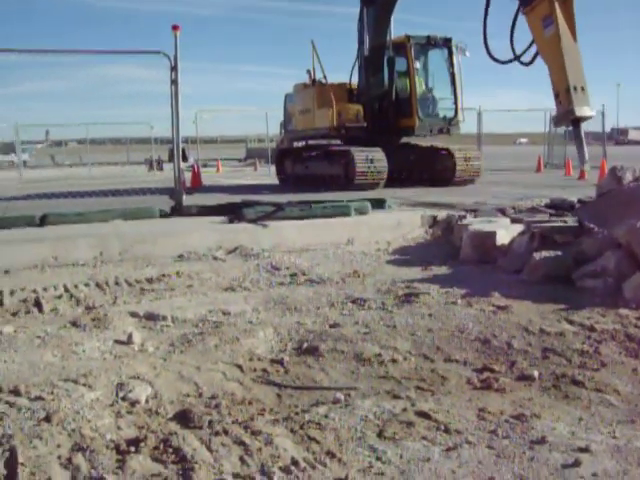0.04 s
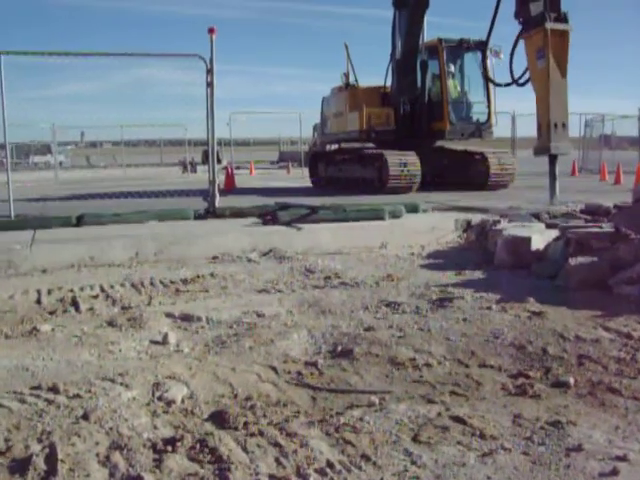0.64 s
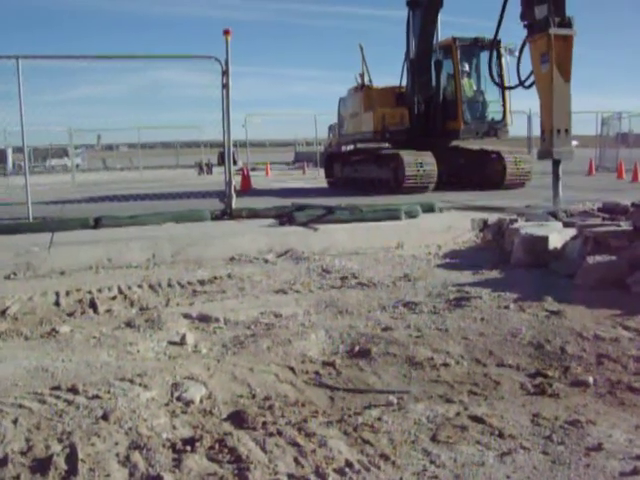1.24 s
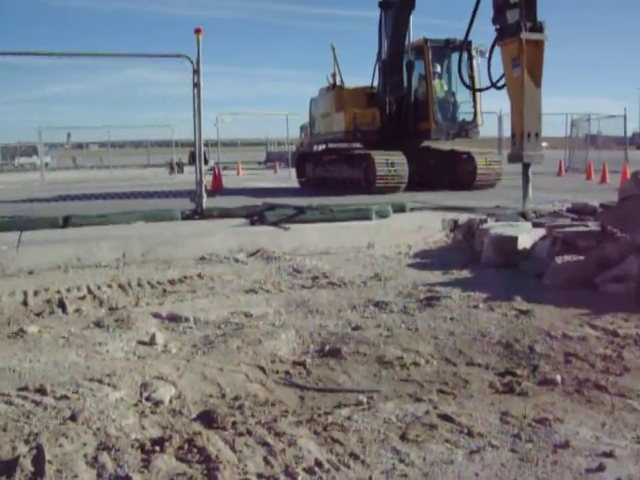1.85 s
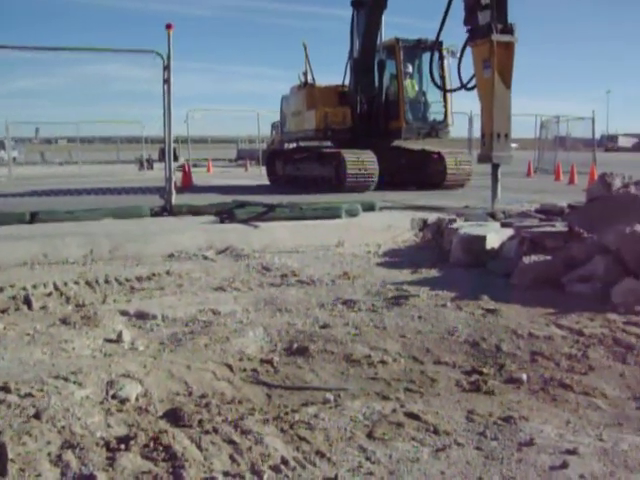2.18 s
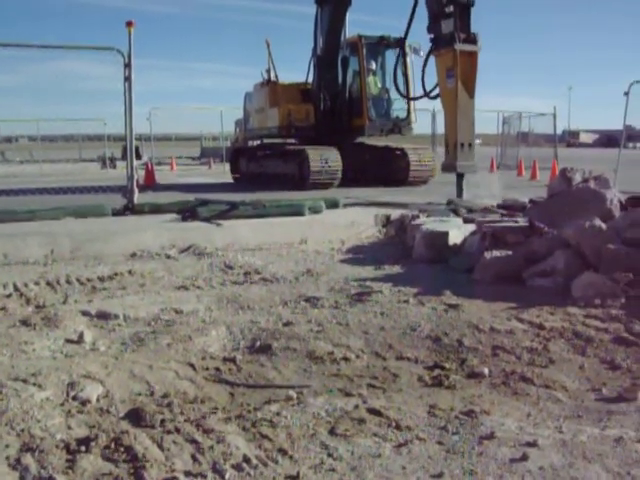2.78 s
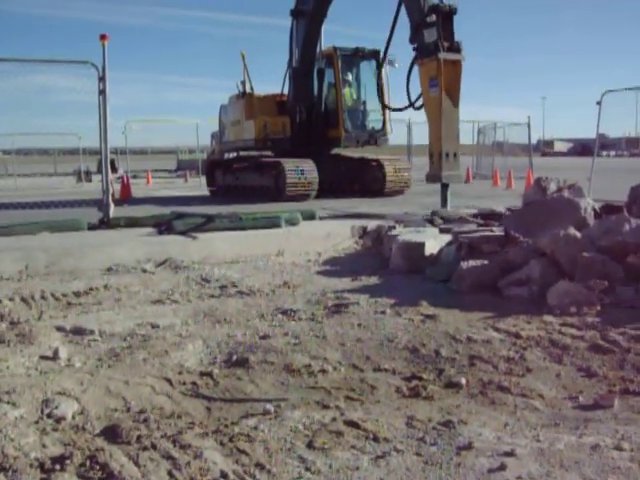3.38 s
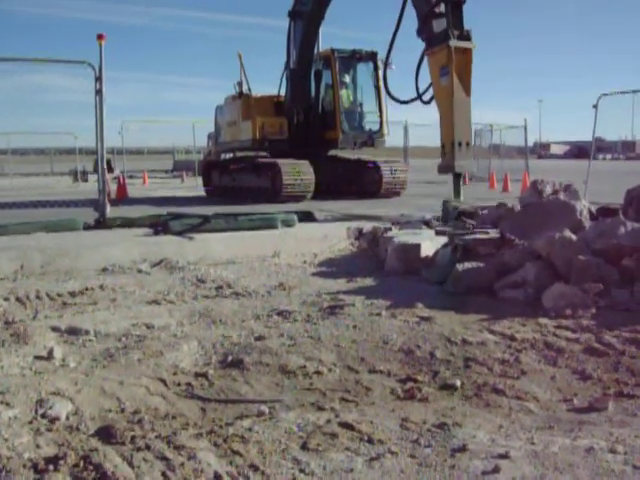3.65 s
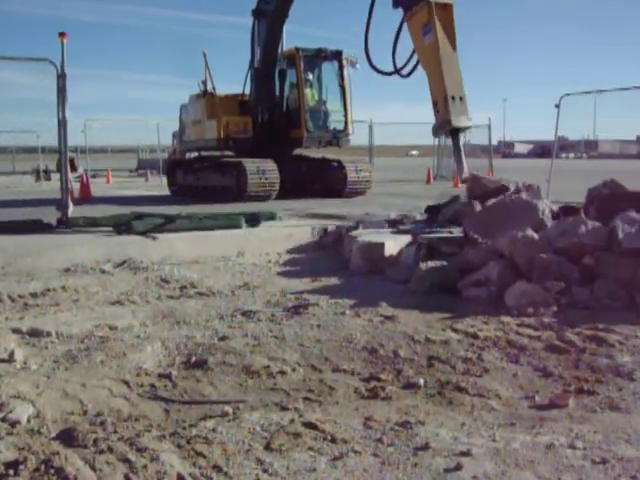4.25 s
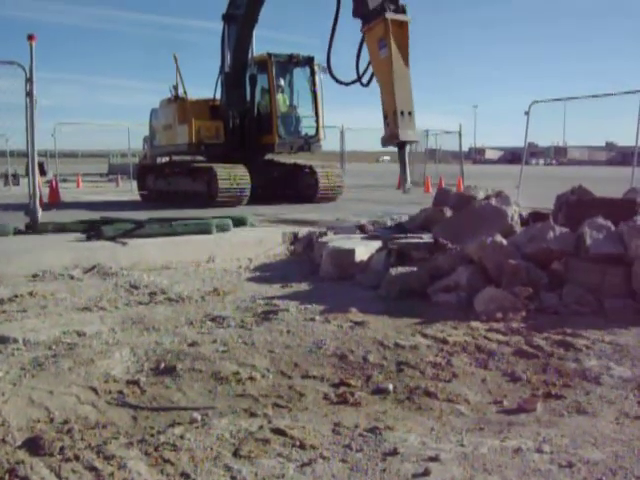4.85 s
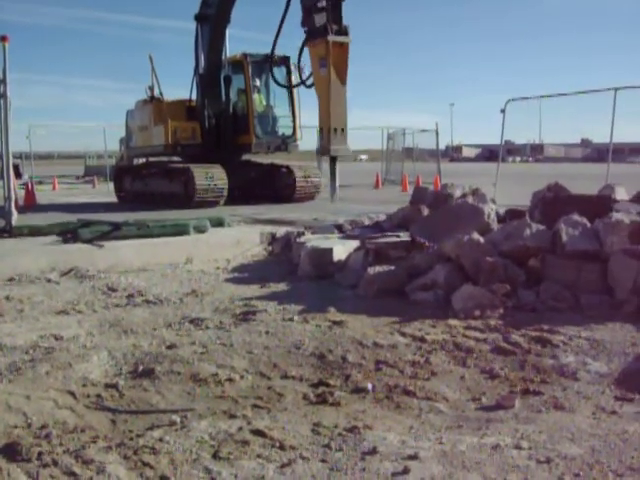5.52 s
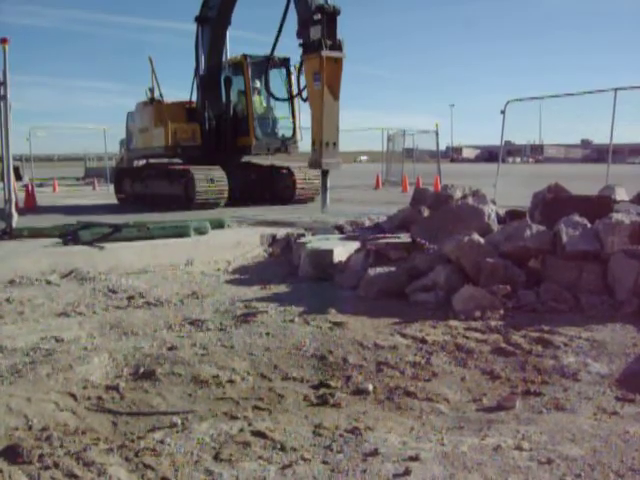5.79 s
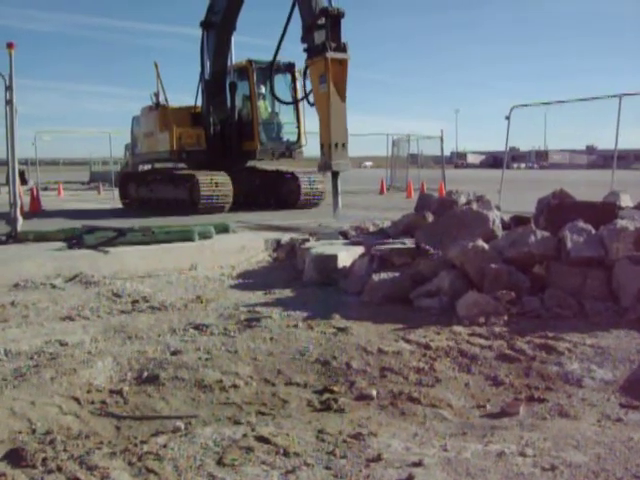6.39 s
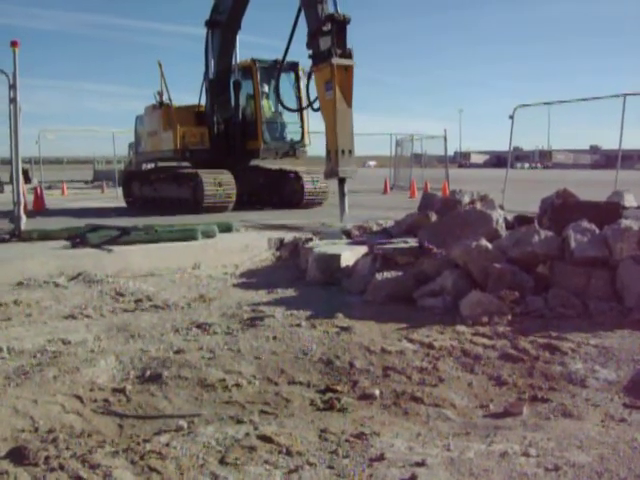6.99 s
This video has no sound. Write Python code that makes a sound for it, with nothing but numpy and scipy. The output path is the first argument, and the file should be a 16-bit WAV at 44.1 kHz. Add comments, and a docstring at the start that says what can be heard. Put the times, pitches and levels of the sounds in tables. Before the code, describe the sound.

An excavator's diesel engine roars steadily on open ground. After a few stone knocks, its hydraulic breaker hits rock eleven times in a fast, even run, each blow cracking, thudding and ringing the steel chisel. Rubble drops, then the chisel scrapes through grit, clinks and shoves stones while a valve whistles briefly with the boom's moves. The microphone's level dips under the blows, so the engine ducks and swells back.

```python
"""An excavator's hydraulic breaker pounds a rock: eleven blows that crack, thud and ring its steel chisel.
Around the blows the chisel knocks, shoves and scrapes stones, and a valve sings as the boom swings.
The diesel engine roars steadily underneath, on open ground. An automatic volume control turns
everything down under the blows, so the engine sounds quieter there and swells back afterwards."""
import sys
import numpy as np
from scipy.fft import rfft, irfft, next_fast_len
from scipy.io import wavfile
from scipy.ndimage import uniform_filter1d, minimum_filter1d, map_coordinates

SR = 44100
rng = np.random.default_rng(int(sys.argv[2]) if len(sys.argv) > 2 else 0)


def to_wav(sig):
    """Store sig (one row per channel, or 1-D mono) as 16-bit WAV at the path in sys.argv[1].

    Samples outside -1..1 are clipped; the rate is SR.
    """
    pcm = np.clip(np.atleast_2d(sig), -1, 1) * 32767
    pcm = np.round(pcm).astype(np.int16)
    wavfile.write(sys.argv[1], SR, pcm.T)  # frames by channels


N = 310905


def amp(db):
    """Turn decibels into a gain."""
    return 10 ** (np.asarray(db) / 20)


def unit(x):
    """Scale x to an average (rms) level of 1."""
    return x / np.sqrt(np.mean(x ** 2) + 1e-20)


def wobble(rate):
    """A smooth random curve with rate new values a second."""
    points = rng.standard_normal(int(N * rate / SR) + 4)
    return map_coordinates(points, [np.arange(N) * rate / SR], order=2)


def jitter(length, smoothing):
    """A fast random tremble, averaged over smoothing samples."""
    return unit(uniform_filter1d(rng.standard_normal(length), size=smoothing))


def filtered(x, response):
    """Scale each frequency in x by response(hz)."""
    size = next_fast_len(len(x) + 8192)
    return irfft(rfft(x, size) * response(np.fft.rfftfreq(size, 1 / SR)), size)[:len(x)]


def noise(spectrum, length):
    """Noise at level 1, its tone shaped by rows of frequency in Hz and level in dB."""
    points_hz, db = np.transpose(spectrum)
    white = rng.standard_normal(length)
    return unit(filtered(white, lambda hz: amp(np.interp(np.log(hz + 1), np.log(points_hz), db))))


def fade(t, t60):
    """Die away, dropping 60 dB in t60 seconds (the fade time)."""
    return np.exp(-np.log(1000) * t / max(t60, 1e-3))


def add(track, start, sound):
    """Mix a sound into the track at start seconds."""
    part = track[max(round(start * SR), 0):][:len(sound)]
    part += sound[:len(part)]


# Engine notes and gear whine. Each row: multiple of the crankshaft's speed, level in dB.
CRANK_TONES = [(1, -27), (2, -33), (3, -13.5), (4, -9.5), (5, -3), (6, -4.5), (7, -10.5), (8, -7), (9, -4),
               (10, -8.5), (11, -5), (12, -1.5), (13, -10), (14, -10.5), (15, -26), (16, -3.5), (17, -1),
               (18, -16), (19, -15), (20, -11), (21, -10.5), (22, -3), (23, 2), (24, -30.5), (25, -3),
               (26, -2.5), (27, -15), (28, -4), (29, -7), (30, -10.5)]
GEAR_TONES = [(52, -13), (58, -17)]
# Cooling fan and oil pump. Each row: pitch in Hz, level in dB, waver as a share of the pitch.
FAN_AND_PUMP = [(264.3, -11.5, 0.009), (948, -19, .016), (1049, -20.5, 0.0025)]
def spinning_parts(turns, tone_db=-9, flutter_db=2):
    """Crankshaft, gears, fan and pump hum; moving air makes each note flutter on its own."""
    tones = hums = 0
    for multiple, db in list(CRANK_TONES) + list(GEAR_TONES):
        level = amp(db + flutter_db * wobble(8))
        tones += level * np.sin(2 * np.pi * (multiple * turns + 0.71 * rng.random()))
    for hz, db, waver in FAN_AND_PUMP:
        level = amp(db + flutter_db * wobble(3.8))
        pitch = hz * (1 + waver * wobble(25))
        hums += level * np.sin(2 * np.pi * np.cumsum(pitch) / SR)
    return amp(tone_db) * tones + hums


# The strength of each of the three firings in one crankshaft turn.
FIRING_STRENGTHS = [0.94, 0.46, 0.36]
# Injector clatter, burning fuel, and a bright tick that the stones also use.
# Each row: frequency in Hz, level in dB.
CLATTER_SPECTRUM = [(700, -27), (1050, -5.5), (1550, -0.5), (1720, -12), (1900, 7), (2450, 4),
                    (3300, -27.5), (5500, -26)]
ROAR_SPECTRUM = [(100, -23.5), (200, -5), (290, -4), (380, -0.5), (500, 2.5), (660, 5), (950, 3),
                 (1180, -2.5), (1280, -11.5), (1450, -6), (1750, -13.5), (2450, -12), (3300, -17),
                 (5500, -25)]
TICK_SPECTRUM = [(500, -26.5), (1500, 1), (2250, 15), (3500, -4.5), (5000, -1), (6000, -10)]
def combustion(turns, turns_per_s, knock=1.35, scatter_db=1.24, sway_db=1.72):
    """The roar jumps at each firing, the injectors clatter, and each turn's hardest firing ticks."""
    per_turn = len(FIRING_STRENGTHS)
    firing, progress = np.divmod((turns + 1) * per_turn, 1)
    firing = firing.astype(int)
    scatter = amp(scatter_db * rng.standard_normal(firing.max() + 1))
    strength = np.take(FIRING_STRENGTHS, firing % per_turn) * scatter[firing]
    since_firing = progress / (turns_per_s * per_turn)
    pulses = unit(uniform_filter1d(1 + knock * strength * fade(since_firing, 0.14), size=50))
    # the same clatter repeats on every turn
    one_turn = noise(CLATTER_SPECTRUM, round(SR / turns_per_s))
    clatter = np.interp(turns % 1, np.linspace(0, 1, len(one_turn)), one_turn)
    sway = amp(sway_db * wobble(12))
    roar = amp(-3) * noise(ROAR_SPECTRUM, N) + amp(-20) * clatter
    tick = amp(-12) * fade(turns % 1 / turns_per_s, 0.025) * noise(TICK_SPECTRUM, N)
    return pulses * sway * roar + tick


# Spells when the engine's sound is turned down, or its rumble swells.
# Each row: start and end in seconds, change of roar in dB, change of rumble in dB.
VOLUME_CHANGES = [(0, 0.25, -5, -3.5), (1.498, 2.983, -1.5, -10.5), (3.402, 3.8, -0.5, 3.5),
                  (4.103, 4.957, -2.5, -2.5)]
# Exhaust rumble. Each row: frequency in Hz, level in dB.
EXHAUST_SPECTRUM = [(15, -34), (35, -25), (55, -19.5), (71, -4), (90, -14), (140, -1.5), (190, -2.5),
                    (270, -1.5), (400, -21.5), (900, -50)]
def engine(turns_per_s=27.055, roar_db=-12.5, rumble_db=-19, ramp_s=0.13, settled_s=4.9):
    """A six-cylinder diesel roars and rumbles; its speed wavers more while the chisel works."""
    t = np.arange(N) / SR
    for start, end, roar_change, rumble_change in VOLUME_CHANGES:
        depth = np.clip(1 + np.minimum(t - start, end - t) / ramp_s, 0, 1)
        roar_db += depth * roar_change
        rumble_db += depth * rumble_change
    working = np.clip(2 * (settled_s - t), 0, 1)
    wander = 0.0053 * wobble(5) + 0.012 * working * wobble(14)
    turns = turns_per_s * (t - 0.0155) + wander
    roar = spinning_parts(turns) + combustion(turns, turns_per_s)
    rumble = amp(rumble_db + 2.1 * wobble(15)) * noise(EXHAUST_SPECTRUM, N)
    return amp(roar_db) * roar + rumble


# One whistle for each move of the boom.
# Each row: start and length in seconds, level in dB, first and last pitch in Hz.
VALVE_WHISTLES = [(3.264, .24, -21, 980, 935), (3.8, .42, -22.5, 947, 961), (4.695, 0.11, -12.5, 975, 980),
                  (4.876, .38, -19, 960, 940), (5.297, .22, -20.5, 928, 975)]
def valve(sag_hz=11, waver=0.0027, ramp_s=0.024):
    """Oil squeezing through a valve sings a gliding note that sags in the middle."""
    track = np.zeros(N)
    for start, length, db, first_hz, last_hz in VALVE_WHISTLES:
        progress = np.linspace(0, 1, round(length * SR))
        hz = first_hz + (last_hz - first_hz) * progress - sag_hz * np.sin(np.pi * progress)
        hz *= 1 + waver * wobble(40)[:len(hz)]
        opening = np.minimum(np.minimum(progress, 1 - progress) * length / ramp_s, 1)
        add(track, start, amp(db) * opening * np.sin(2 * np.pi * np.cumsum(hz) / SR))
    return track


# Drags of the chisel. Each row: start and end in seconds, level at the end in dB.
CHISEL_DRAGS = [(0, .035, -25.5), (3.2, 4.02, -32.5), (5.15, 5.45, -39)]
# Crushed grit. Each row: frequency in Hz, level in dB.
GRIT_SPECTRUM = [(900, -28), (2200, -4), (3500, -1), (4800, 4.5), (6000, -9)]
def scraping(hiss_db=-35.5, growth_db=7.5, release_s=0.24, grain_db=4):
    """The tip crunches through grit, ever harder until it slips off, over a faint grainy hiss."""
    t = np.arange(N) / SR
    level = amp(hiss_db)
    for start, end, db in CHISEL_DRAGS:
        to_go = np.clip((end - t) / (end - start), 0, 1)
        release = fade(np.maximum(t - end, 0), release_s)
        level = level + (t >= start) * amp(db - growth_db * to_go) * release
    grains = amp(grain_db * wobble(150))
    return level * unit(grains * noise(GRIT_SPECTRUM, N))


# A loose stone's knock. Each row: frequency in Hz, level in dB.
STONE_SPECTRUM = [(100, -26.5), (330, 2), (550, 6.5), (800, 2), (1050, 3), (1350, -8), (1800, -13.5),
                  (2300, -8.5), (3300, -20.5), (6000, -30.5)]
def stone(pitch, rise_s=0.0017, fade_s=0.26, grit_db=-12, width_hz=110):
    """One stone knocks hollowly and sheds grit in uneven jolts."""
    t = np.arange(SR // 2) / SR
    jolts = unit(amp(-2.6 * jitter(len(t), 150)))
    swell = np.minimum(t / rise_s, 1)
    since_peak = np.maximum(t - rise_s, 0)
    knock = noise(STONE_SPECTRUM, len(t))
    hollow = unit(filtered(knock, lambda hz: 1 + 1.1 / (1 + ((hz - pitch) / width_hz) ** 2)))
    grit = amp(grit_db) * noise(TICK_SPECTRUM, len(t)) * fade(since_peak, 0.65 * fade_s)
    return swell * jolts * (hollow * fade(since_peak, fade_s) + grit)


# Knocked stones. Each row: start in seconds, level in dB, pitch in Hz.
STONE_KNOCKS = [(.012, -13, 620), (.124, -7, 793), (1.226, -10, 708), (2.556, -3.5, 1430),
                (2.791, -4, 1460), (3.231, -13.5, 640), (4.426, -8, 728), (4.625, -9.5, 1025)]
# Shoved stones. Each row: start in seconds, level in dB, swell time in seconds, pitch in Hz.
STONE_SHOVES = [(1.38, -9.5, .045, 970), (2.4, -0.5, 0.032, 880), (4.25, -8, 0.022, 1040),
                (4.48, -10, 0.013, 540), (4.78, -8, .04, 1054), (6.11, -9.5, .01, 767)]
def stones(pieces=6, rubble_from_s=2.3, rubble_to_s=2.95, rubble_db=-11.5, rubble_hz=1190):
    """Knocked stones sound at once, shoved ones swell, and rubble drops as the rock breaks."""
    track = np.zeros(N)
    for start, db, pitch in STONE_KNOCKS:
        add(track, start, amp(db) * stone(pitch))
    for start, db, rise_s, pitch in STONE_SHOVES:
        add(track, start, amp(db) * stone(pitch, rise_s, fade_s=0.33, grit_db=-13))
    for piece in range(pieces):
        start = rubble_from_s + (rubble_to_s - rubble_from_s) * (piece + rng.random()) / pieces
        pitch = rubble_hz * np.exp(0.25 * rng.normal())
        add(track, start, amp(rubble_db) * stone(pitch))
    return track


# Clinks of steel. Each row: start in seconds, pitch in Hz, level in dB, fade time in seconds.
TIP_CLINKS = [(4.184, 5500, -18, 0.058), (4.184, 4180, -28.5, 0.28), (4.705, 5040, -26.5, 0.14)]
def clinks():
    """The tip glances off a stone with a click and a short, high ping."""
    track, t = np.zeros(N), np.arange(SR // 2) / SR
    for start, hz, db, fade_s in TIP_CLINKS:
        click = amp(5) * noise(TICK_SPECTRUM, len(t)) * fade(t, 0.086)
        ping = np.sqrt(2) * fade(t, fade_s) * np.sin(2 * np.pi * hz * t)
        add(track, start, amp(db) * (ping + click))
    return track


# The low notes of the breaker's housing. Each row: pitch in Hz, level in dB, fade time in seconds.
HOUSING_NOTES = [(174.6, -3.5, 0.082), (207, 1, 0.078), (231.3, 0.5, 0.098)]
# Its dull shake. Each row: frequency in Hz, level in dB.
SHAKE_SPECTRUM = [(25, -28), (60, -28.5), (120, -14), (200, 10), (300, -15), (600, -29), (2000, -70.5)]
def housing_thud(t, detune=0.029):
    """A blow shakes the housing, at slightly different pitches each time."""
    notes = 0
    for hz, db, fade_s in HOUSING_NOTES:
        pitch = hz * (1 + detune * rng.normal())
        notes += amp(db) * fade(t, fade_s) * np.sin(2 * np.pi * pitch * t)
    shake = amp(-7) * noise(SHAKE_SPECTRUM, len(t)) * fade(t, 0.11)
    return (notes + shake) * (1 - fade(t, 0.03))


# The steel chisel's notes. Each row: pitch in Hz, level in dB, share of the ring time.
CHISEL_NOTES = [(2090, -15, .8), (2466, -6.5, .8), (2700, -22, 0.48), (3090, -17, 0.82), (3205, -10.5, 0.9),
                (4000, -21, 0.71), (4742, -1.5, 0.95), (4785, -13.5, 1), (5200, -17, 1), (5330, -20, 1),
                (5700, -17, 0.47)]
def chisel_ring(t, ping_db, free_s, tail, ring_s=0.5, weak_db=-12, scatter_db=3, linger_s=0.01):
    """The chisel rings as it bounces, until the rock grips it and chokes the main ping first."""
    main_db = max(db for hz, db, share in CHISEL_NOTES)
    ring = 0
    for hz, db, share in CHISEL_NOTES:
        weak = db < main_db
        # rattling in its sleeve blurs the chisel's notes
        blur = (0.3 if weak else 0.06) * jitter(len(t), 200)
        level = amp(db + (weak_db + scatter_db * rng.normal() if weak else ping_db))
        choke = 1 / (1 + (t / (free_s + linger_s * weak)) ** 8)
        note = np.sin(2 * np.pi * hz * t + blur + rng.uniform(0, 2 * np.pi))
        ring += level * (choke + tail) * fade(t, ring_s * share) * note
    return np.sqrt(2) * ring * (1 - fade(t, 0.0082))


# The blows. Each row: start in seconds, thud level in dB, change to the main ping in dB,
# seconds until the rock grips the chisel.
BREAKER_BLOWS = [(1.4669, -26, -18, 0.088), (1.601, -2, -10.5, 0.024), (1.7239, -1, -16.5, 0.012),
                 (1.8495, -0.5, -11.5, 0.0099), (1.9738, -2, -7.5, 0.013), (2.1055, -3.5, -12, 0.017),
                 (2.24, -2.5, -10.5, .017), (2.3719, -0.5, -10, 0.034), (2.507, -4.5, -7, 0.065),
                 (2.647, -2, -14, 0.017), (2.793, -8.5, -22, 0.013)]
# Steel cracking on rock. Each row: frequency in Hz, level in dB.
CRACK_SPECTRUM = [(100, -28.5), (400, 3.5), (750, 9.5), (1400, 1), (1800, -12), (2450, 8.5), (3600, -8),
                  (4900, 2), (6000, -10)]
def breaker(seated_db=-6.5, loss_db_per_s=128.5):
    """Each piston blow cracks on the rock, thuds in the housing and rings the chisel."""
    track, t = np.zeros(N), np.arange(SR // 2) / SR
    snap = amp(-1) * fade(t, 0.012)
    tail = amp(-16) * fade(t, 0.49)  # sound scattered by the ground and the machine
    for start, thud_db, ping_db, free_s in BREAKER_BLOWS:
        # a firmly seated chisel cracks hardest; the longer it rings free, the weaker the crack
        crack_db = seated_db - loss_db_per_s * free_s
        crack = amp(crack_db) * noise(CRACK_SPECTRUM, len(t)) * (snap + fade(t, 0.15) + tail)
        thud = amp(thud_db) * housing_thud(t)
        add(track, start, crack + thud + chisel_ring(t, ping_db, free_s, tail))
    return track


def scene():
    """All the sounds meet in one channel."""
    return (engine() + breaker() + stones() + clinks() + scraping() + valve())[None]


def volume_control(x, threshold_db=-19, treble_hz=3000, hold_s=0.32, release_s=0.078):
    """Sharp treble pulls the volume down at once; it stays down a moment, then comes back quickly."""
    treble = filtered(x, lambda hz: 1 - 1 / (1 + (hz / treble_hz) ** 8))
    level = np.sqrt(np.abs(uniform_filter1d(treble ** 2, size=301, origin=100)) + 1e-12)
    gain = np.minimum(amp(threshold_db) / level, 1)
    hold, release = int(hold_s * SR) | 1, int(release_s * SR) | 1  # odd numbers of samples
    held = minimum_filter1d(gain, hold, origin=hold // 2)
    eased = np.minimum(held, uniform_filter1d(held, release, origin=release // 2))
    return x * uniform_filter1d(eased, size=60)


def record(dry, edge_hz=5650, ceiling=0.73, hardness=14, top_hz=15800):
    """Turn down the loud moments, cut the high treble steeply and round off the tallest peaks."""
    x = volume_control(dry[0])
    x = filtered(x, lambda hz: 1 / np.sqrt(1 + (hz / edge_hz) ** 68))
    x = x / (1 + np.abs(x / ceiling) ** hardness) ** (1 / hardness)
    return filtered(x, lambda hz: hz < top_hz)[None]


dry = scene()
out = record(dry)
to_wav(out)
```